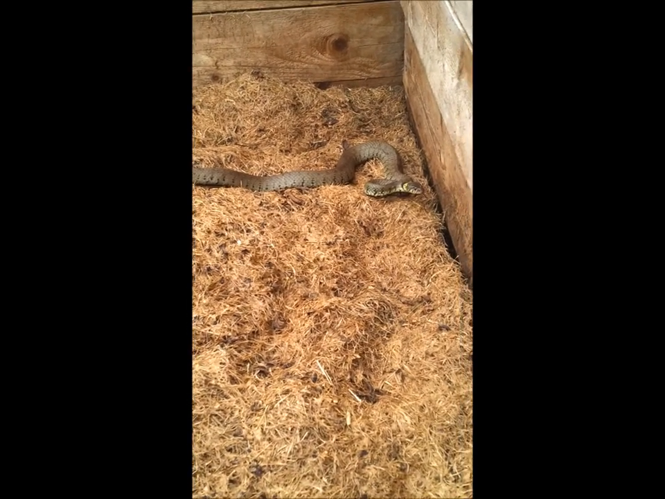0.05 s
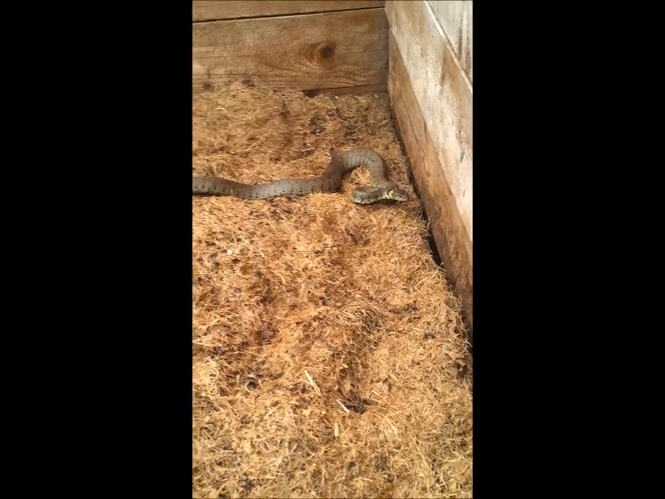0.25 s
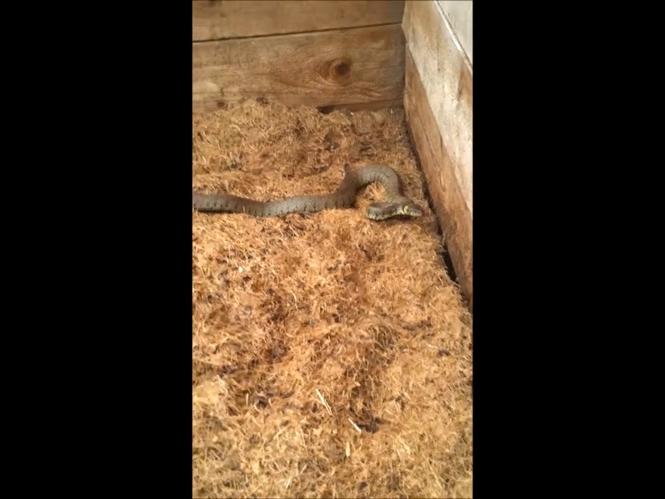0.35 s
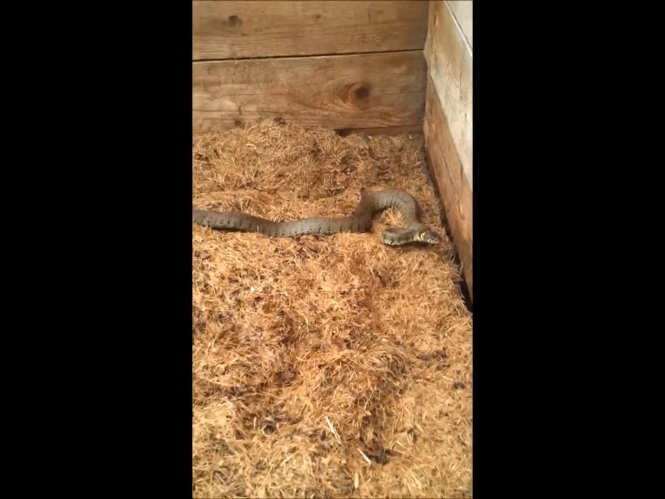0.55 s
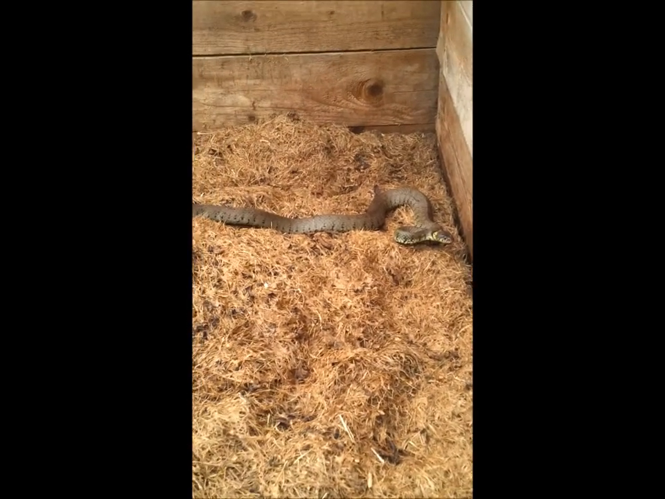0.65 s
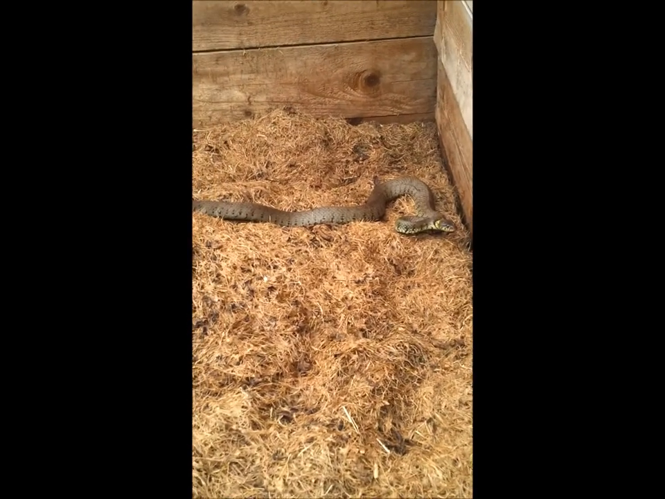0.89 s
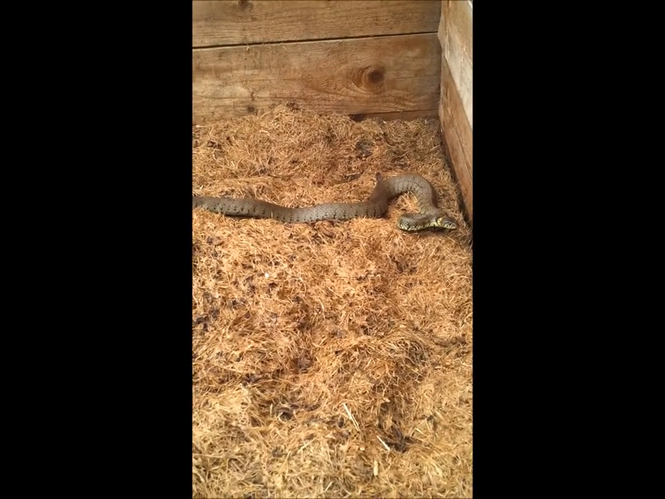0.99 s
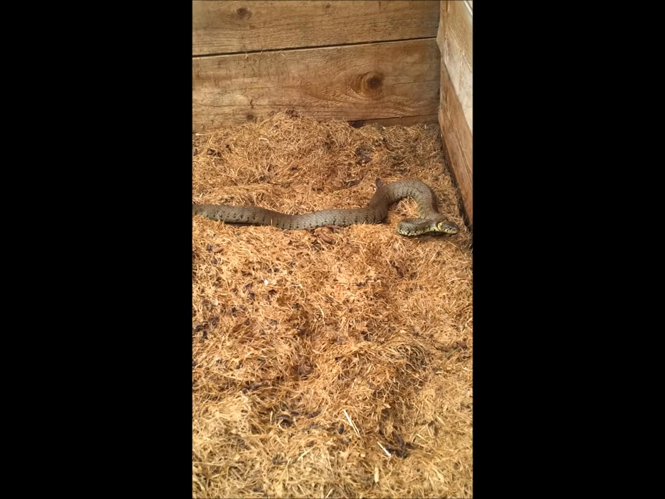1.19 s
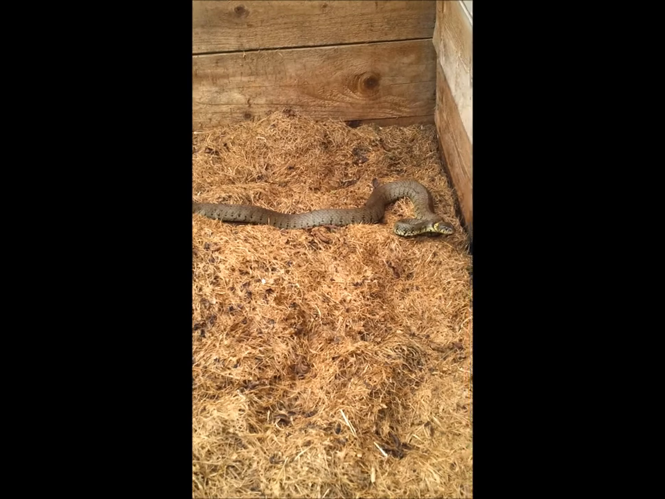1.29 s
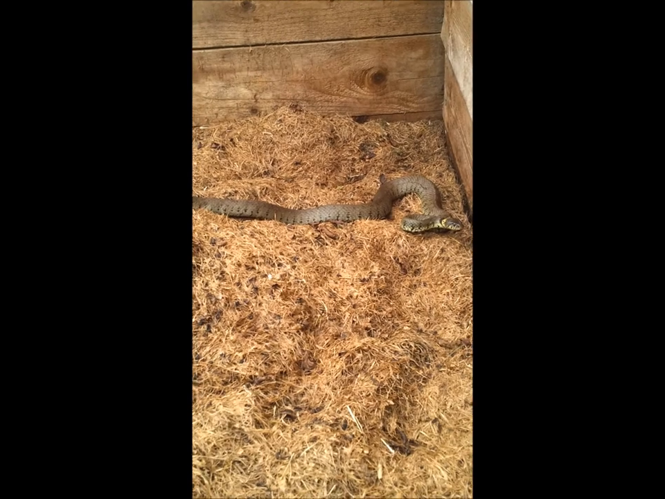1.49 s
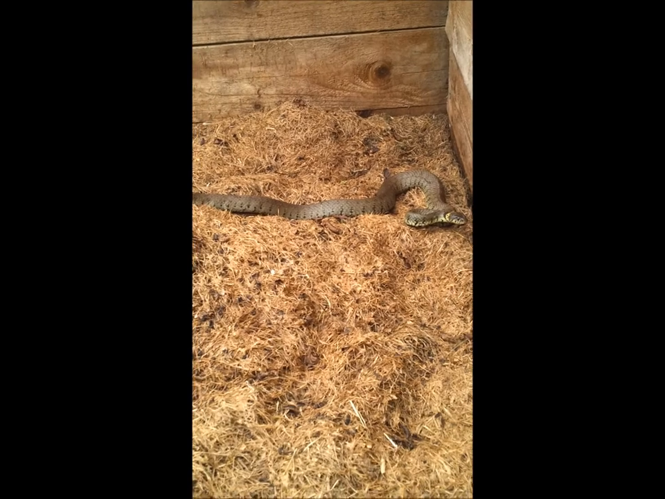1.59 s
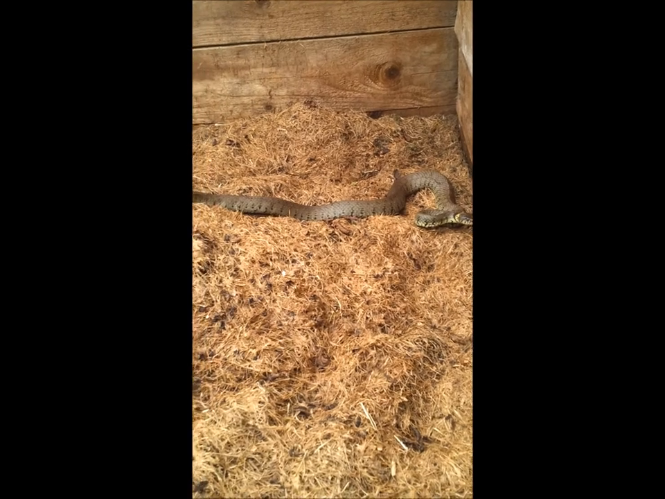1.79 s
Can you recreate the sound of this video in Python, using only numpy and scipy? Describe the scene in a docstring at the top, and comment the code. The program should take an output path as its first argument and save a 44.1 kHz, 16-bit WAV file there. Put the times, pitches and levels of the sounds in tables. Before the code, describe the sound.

A loud cloth swish close to the microphone builds from about 0.2 seconds, with small dry ticks and dull handling bumps, peaking brightly near 0.4. Thin hissing rubs follow until 0.7 seconds, then return more faintly. A very faint, distant whistle sounds around 0.8. Soft rustling grows slightly from 1.2 seconds to the end, near 1.9, over quiet air and low handling rumble in a wooden pen.

```python
"""Rustling in a snake's pen

A snake lies on dry bedding in a wooden pen. Two small ticks lead into one loud swish,
probably cloth close to the microphone, whose treble swells as it speeds up. Thin hissing rubs
and a soft rustle follow; like the swish, they are stick-slip friction of many fibres.
Beneath them lie quiet air, the rumble of a hand-held camera and one faint far whistle."""
import sys
import numpy as np
from scipy import signal
from scipy.fft import rfft, irfft
from scipy.io import wavfile

SR = 44100
rng = np.random.default_rng(int(sys.argv[2]) if len(sys.argv) > 2 else 0)


def persist_wave(psi):
    """Save psi, clipped to +-1, as 16-bit WAV."""
    counts = np.round(np.clip(psi, -1, 1) * 32767).astype(np.int16)
    wavfile.write(sys.argv[1], SR, np.atleast_2d(counts).T)


N = 81585
T = np.arange(N) / SR
FREQS = np.fft.rfftfreq(N, 1 / SR)


def amp(db):
    """Amplitude ratio of a level in decibels."""
    return 10 ** (np.asarray(db) / 20)


def unit(x):
    """Normalisation to rms 1."""
    return x / np.sqrt(np.mean(x ** 2) + 1e-20)


def envelope(points, fade_db_per_s=400):
    """Gain along a curve of (seconds, dB), with exponential fades beyond its ends."""
    s, db = np.transpose(points)
    return amp(np.interp(T, s, db) - fade_db_per_s * abs(T - np.clip(T, s[0], s[-1])))


def gain_at(f, spectrum):
    """Magnitude response: (Hz, dB) points interpolated over log frequency."""
    hz, db = np.transpose(spectrum)
    return amp(np.interp(np.log(f + 1), np.log(hz + 1), db))


def colour(x, spectrum):
    """Spectral shaping of a steady sound, at rms 1."""
    return unit(irfft(rfft(x) * gain_at(FREQS, spectrum), N))


def drift(hz):
    """Low-pass noise: a random wander of rms 1."""
    return unit(irfft(rfft(rng.standard_normal(N)) * np.exp(-(FREQS / hz) ** 2), N))


def friction(slip_share, slips_per_s, clump_db, clump_hz):
    """Stick-slip friction: separate slips share the power with a smooth wash, and both swell in clumps."""
    slips = (rng.random(N) < slips_per_s / SR) * rng.choice([-1, 1], N)
    slips = unit(slips * amp(5.7 * np.minimum(rng.exponential(1, N), 3)))
    wash = rng.standard_normal(N)
    clumps = amp(clump_db * drift(clump_hz))
    return (np.sqrt(slip_share) * slips + np.sqrt(1 - slip_share) * wash) * clumps


# Spectrum of the air. Each row: frequency in Hz, relative level in dB.
AIR_SPECTRUM = [(20, -11), (60, -9), (100, -9.5), (150, -0.5), (205, -10.5), (360, -14.5), (620, -12.5),
                (900, -18.5), (1700, -20), (2900, -24.5), (4800, -25.5), (7300, -21), (9000, -26),
                (11800, -31)]

def air(level_db=-51):
    """Ambient noise: steady, and strongest at low frequencies."""
    return amp(level_db) * colour(rng.standard_normal(N), AIR_SPECTRUM)


# Spectrum of the rumble. Each row: frequency in Hz, relative level in dB.
RUMBLE_SPECTRUM = [(10, -12), (28, -3), (45, -2), (68, 3), (95, -5.5), (150, -4.5), (200, -16.5),
                   (320, -17), (700, -52), (3000, -43)]
# Course of the rumble. Each row: time in seconds, level in dB.
RUMBLE_LEVELS = [(0, -49), (.11, -42), (.18, -47.5), (.27, -35), (.385, -42), (.47, -47.5), (.8, -49.5),
                 (.89, -46), (.94, -48), (.99, -39.5), (1.07, -45), (1.22, -42), (1.34, -47), (1.41, -48),
                 (1.72, -52.5), (1.83, -43)]
# Dull bumps. Each row: start in seconds, envelope peak in dB, pitch in Hz, ring length in cycles.
GRIP_BUMPS = [(0.085, -37.5, 60.3, 1.8), (.1985, -31, 209, 0.65), (0.244, -19, 183, 0.42),
              (.2758, -21.5, 252, 0.44), (.3135, -18.5, 582, 2.6), (0.356, -24, 453, 1.7),
              (0.3703, -17, 150, 0.51), (0.402, -26, 100, 0.46), (.436, -25.5, 235, 0.53),
              (.846, -40, 580, 1.2), (.878, -34, 72.4, 0.58), (0.987, -32.5, 131, 0.66),
              (1.115, -33.5, 111, 0.75), (1.161, -35.5, 646, 0.72), (1.217, -31, 92, 1.04),
              (1.273, -33, 140, 0.76), (1.312, -34, 109, 0.89), (1.325, -29.5, 73, 0.54),
              (1.7922, -38, 950, 3.7)]

def handling():
    """Structure-borne sound: a shifting grip makes low rumble and heavily damped oscillations."""
    out = envelope(RUMBLE_LEVELS) * colour(rng.standard_normal(N), RUMBLE_SPECTRUM)
    for start, db, hz, ring_cycles in GRIP_BUMPS:
        cycles = np.maximum(T - start, 0) * hz
        rise = 2 * cycles / ring_cycles  # 1 at the envelope's peak
        out += amp(db) * rise * np.exp(1 - rise) * np.sin(2 * np.pi * cycles)
    return out


# Spectrum of a tick. Each row: frequency in Hz, relative level in dB.
TICK_SPECTRUM = [(80, -6), (400, -4.5), (900, -1), (1200, -1.5), (1700, 0.5), (2600, -7), (3100, -26),
                 (4000, -34), (12000, -26)]
# Dry ticks. Each row: start in seconds, peak level in dB.
DRY_TICKS = [(.0882, -32.5), (.1487, -28), (.1503, -47), (.1845, -38), (.199, -33.5), (0.3149, -20),
             (0.369, -9.5), (.572, -34)]

def ticks(tail_db=-21, tail_t60_s=0.028):
    """Impulse excitation: each snap and its scratchy tail pass through one minimum-phase filter."""
    impulses = np.zeros(N)
    for start, db in DRY_TICKS:
        age = np.maximum(T - start, 0)
        impulses += amp(db + tail_db - 60 * age / tail_t60_s) * (T > start) * rng.standard_normal(N)
        impulses[round(start * SR)] += amp(db)
    log_gain = np.log(gain_at(abs(np.fft.fftfreq(4096, 1 / SR)), TICK_SPECTRUM))
    minimum_phase = np.exp(np.conj(signal.hilbert(log_gain)))
    snap = np.fft.ifft(minimum_phase).real[:2048]
    return signal.fftconvolve(impulses, snap / abs(snap).max())[:N]


# Narrow bands that colour the swish. Each row: centre in Hz, width in Hz, gain in dB.
SWISH_RESONANCES = [(287, 46, 7.5), (536, 37, 6.5), (880, 91, 5), (1790, 93, 1), (2100, 96, -2),
                    (2800, 99, 3.5), (3570, 70, 6), (4180, 220, 5.5), (5400, 410, 2.5)]

def resonate(x):
    """Resonance: bell-shaped peaks, and one shallow dip, in the frequency response."""
    gain_db = sum(db / (1 + (2 * (FREQS - hz) / width) ** 2) for hz, width, db in SWISH_RESONANCES)
    return irfft(rfft(x) * amp(gain_db), N)


# Spectra of the swish's slow body, fast body and treble. Each row: frequency in Hz, relative level in dB.
SLOW_SPECTRUM = [(60, -24), (150, 2), (350, -2), (600, 1.5), (900, -2), (1800, -1.5), (2600, -10),
                 (4000, -23), (12000, -26)]
FAST_SPECTRUM = [(60, -11), (150, 5), (350, 1), (600, 4), (1100, 1.5), (1900, -2), (2800, -11), (4000, -23),
                 (12000, -18)]
TREBLE_SPECTRUM = [(800, -14.5), (2200, 0.5), (3000, 0.5), (4000, -1), (5500, -2), (6800, -7.5),
                   (8500, -12.5), (11500, -14)]
# Course of its body and its treble. Each row: time in seconds, level in dB.
BODY_LEVELS = [(.16, -69), (.225, -46.5), (.265, -38.5), (.315, -30), (.338, -33.5), (.36, -28),
               (.386, -30), (.416, -42), (.445, -42), (.47, -63)]
TREBLE_LEVELS = [(.25, -77), (.29, -47.5), (.34, -41.5), (.362, -32), (.384, -24.5), (.397, -29.5),
                 (.412, -39.5), (.44, -56), (.47, -58)]

def swish(slip_share=0.41, fill_out_at_s=0.363, blend_s=0.012):
    """Sliding friction of cloth: the body turns fuller and deeper while a separate treble fizz swells."""
    rub = resonate(friction(slip_share, slips_per_s=2900, clump_db=2.0, clump_hz=149))
    fullness = 0.5 + 0.5 * np.tanh((T - fill_out_at_s) / blend_s)
    body = (1 - fullness) * colour(rub, SLOW_SPECTRUM) + fullness * colour(rub, FAST_SPECTRUM)
    fizz = resonate(friction(slip_share, slips_per_s=3200, clump_db=2.6, clump_hz=253))
    return body * envelope(BODY_LEVELS) + colour(fizz, TREBLE_SPECTRUM) * envelope(TREBLE_LEVELS)


# Spectrum of a hiss, before it is shifted. Each row: frequency in Hz, relative level in dB.
HISS_SPECTRUM = [(1500, -27), (3500, -15.5), (5000, -10), (6200, -3.5), (7300, 1.5), (8200, -2.5),
                 (9400, -13), (11500, -16)]
# Hissing rubs. Each row: start in seconds, length in seconds, level in dB, spectral peak in Hz.
HISSING_RUBS = [(0.387, 0.063, -43, 6600), (0.501, 0.087, -41.5, 7630), (0.587, 0.062, -46.5, 7400),
                (0.619, .05, -42, 7530), (0.643, 0.024, -40.5, 7100), (0.677, 0.044, -47, 7230),
                (0.743, 0.13, -54.5, 7100), (0.905, 0.055, -55, 6660), (1.137, 0.11, -53, 7000),
                (1.233, 0.3, -59.5, 7600), (1.5, 0.23, -52, 7400), (1.713, 0.087, -55, 7500)]

def hisses(rise_s=0.02, fall_s=0.011, unshifted_peak_hz=7300):
    """Friction noise of light sliding contacts: each is a swell of thin hiss in its own high band."""
    out = np.zeros(N)
    hz, shape_db = np.transpose(HISS_SPECTRUM)
    for start, length, db, peak_hz in HISSING_RUBS:
        attack = np.clip((T - start) / rise_s, 0, 1)
        release = np.exp(-np.maximum(T - start - length + fall_s / 2, 0) / fall_s)
        rub = friction(slip_share=0.34, slips_per_s=4400, clump_db=0, clump_hz=90)
        spectrum = np.c_[hz * peak_hz / unshifted_peak_hz, shape_db]
        out += amp(db) * attack * release * colour(rub, spectrum)
    return out


# Spectrum of the rustle, before the shelf. Each row: frequency in Hz, relative level in dB.
RUSTLE_SPECTRUM = [(100, -15), (280, -3), (420, -2.5), (750, 0), (1200, -2), (1700, -4), (2400, -4),
                   (4000, -6.5), (11000, -9.5)]
# Course of the rustle. Each row: time in seconds, level in dB, shelf edge in Hz.
RUSTLE_COURSE = [(0, -76, 2380), (.48, -57, 2320), (.565, -52.5, 2370), (0.609, -57, 2350),
                 (.665, -49.5, 2500), (.74, -59.5, 2440), (.845, -56.5, 2740), (.9, -60.5, 2300),
                 (1.03, -56, 2000), (1.12, -56.5, 2130), (1.23, -50.5, 1980), (1.38, -54.5, 1980),
                 (1.49, -49, 2200), (1.535, -52, 2120), (1.58, -49, 2080), (1.66, -50, 2310),
                 (1.72, -49.5, 1900), (1.79, -48, 1730), (1.85, -45.5, 1720)]

def rustle(shelf_db=-12, edge_width_hz=150):
    """Soft, dense friction noise under a treble shelf whose edge sinks towards the end."""
    s, db, edge_hz = np.transpose(RUSTLE_COURSE)
    rub = friction(slip_share=0.17, slips_per_s=3300, clump_db=1.5, clump_hz=120)
    f, t, frames = signal.stft(colour(rub, RUSTLE_SPECTRUM), SR, nperseg=256)
    above_edge = 0.5 + 0.5 * np.tanh((f[:, None] - np.interp(t, s, edge_hz)) / edge_width_hz)
    _, softened = signal.istft(frames * amp(shelf_db * above_edge), SR)
    return envelope(np.c_[s, db]) * unit(softened[:N])


# Course of the far whistle. Each row: time in seconds, pitch in Hz, level in dB.
WHISTLE_COURSE = [(.775, 3160, -69), (.795, 3195, -60.5), (.835, 3200, -56.5), (.895, 3065, -64.5),
                  (.95, 3110, -64), (1.03, 3200, -69), (1.15, 3220, -76), (1.205, 3200, -61),
                  (1.235, 3100, -77)]

def whistle(flutter_db=1.5, pitch_wobble=0.0045):
    """Frequency and amplitude modulation: a pure tone, perhaps a bird, flutters as it dips and rises."""
    s, hz, db = np.transpose(WHISTLE_COURSE)
    pitch = np.interp(T, s, hz) * (1 + pitch_wobble * drift(60))
    tone = np.sqrt(2) * np.sin(2 * np.pi * np.cumsum(pitch) / SR)
    return tone * envelope(np.c_[s, db]) * amp(flutter_db * drift(47))


def pen_reflections(x, level_db=-14, t60_s=0.063, echoes_per_s=2000, delay_s=0.004):
    """Reverberation: the boards return a short scatter of echoes that decays exponentially."""
    t = T[:SR // 4]
    echoes = rng.standard_normal(len(t)) * (rng.random(len(t)) < echoes_per_s / SR)
    tail = echoes * (t > delay_s) * amp(-60 * t / t60_s)
    return amp(level_db) * signal.fftconvolve(x, tail / np.linalg.norm(tail))[:N]


def scene():
    """Superposition in one channel: rubs and ticks with their echoes, plus air, handling and whistle."""
    contacts = swish() + hisses() + rustle() + ticks()
    return (contacts + air() + pen_reflections(contacts) + handling() + whistle())[None]


def record(dry, cutoff_hz=11850):
    """Band limiting: a steep linear-phase low-pass removes the highest treble."""
    lowpass = signal.firwin(801, cutoff_hz, window=("kaiser", 9), fs=SR)
    return signal.oaconvolve(dry, lowpass[None], "same")


dry = scene()
out = record(dry)
persist_wave(out)
```